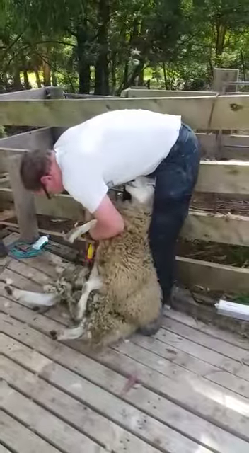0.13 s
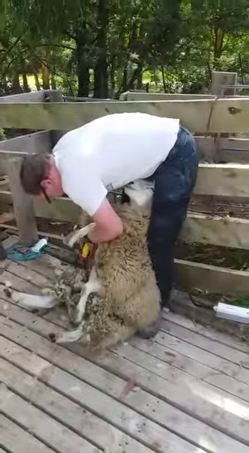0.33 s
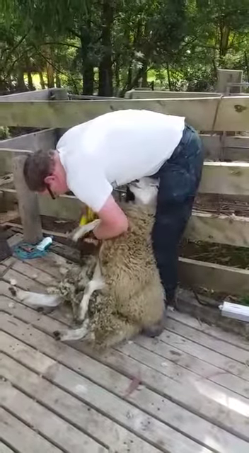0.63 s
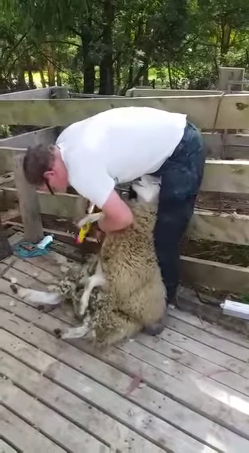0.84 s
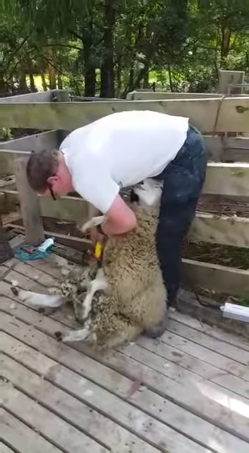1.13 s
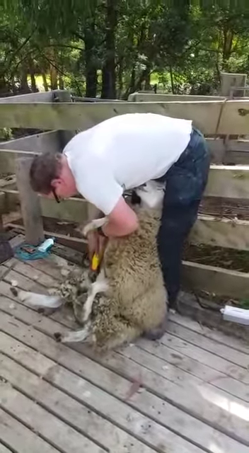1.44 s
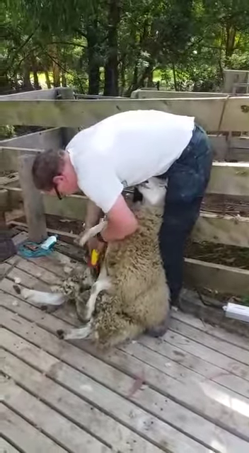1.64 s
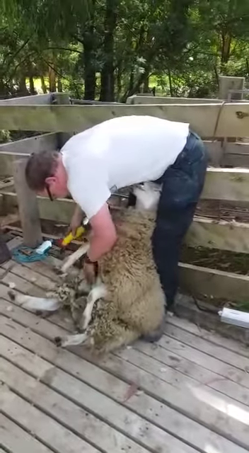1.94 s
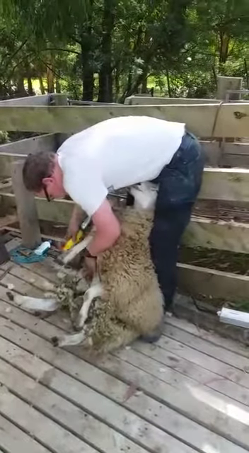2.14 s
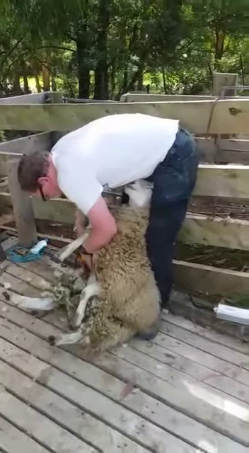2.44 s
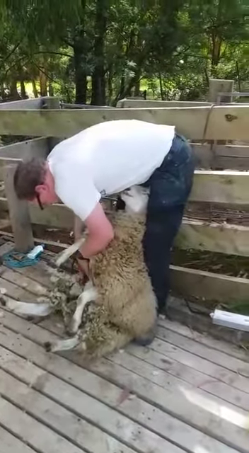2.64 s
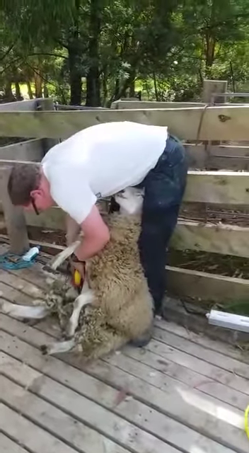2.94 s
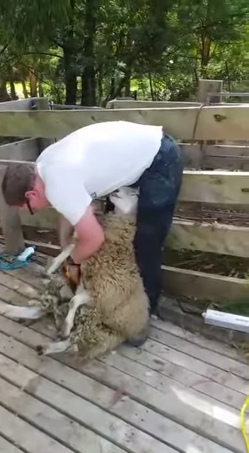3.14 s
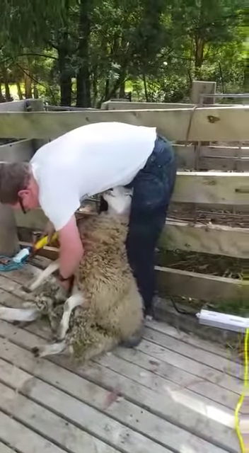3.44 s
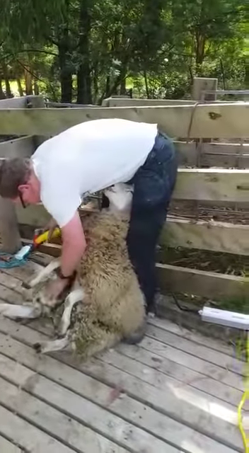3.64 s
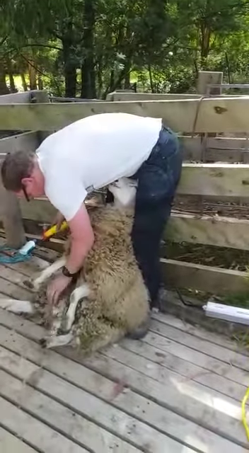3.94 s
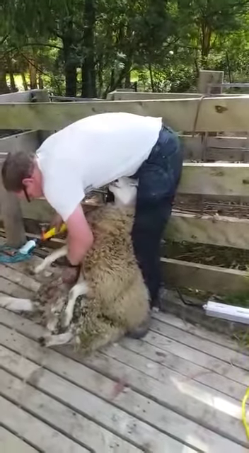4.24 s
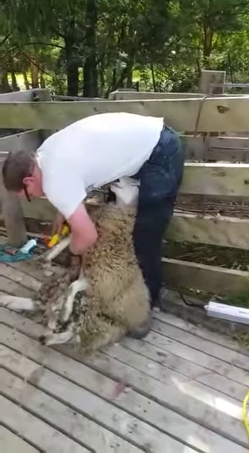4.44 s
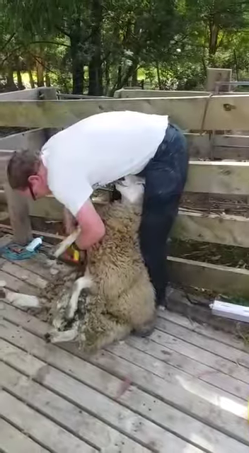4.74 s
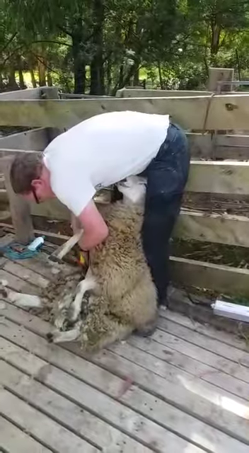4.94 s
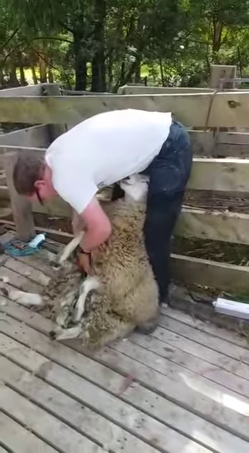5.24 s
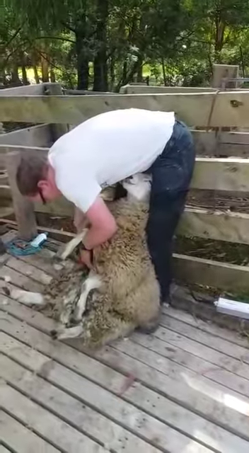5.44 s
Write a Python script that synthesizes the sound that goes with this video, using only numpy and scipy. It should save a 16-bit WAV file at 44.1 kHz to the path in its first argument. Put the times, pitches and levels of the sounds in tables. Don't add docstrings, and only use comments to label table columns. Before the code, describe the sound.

Continuous raspy buzz of electric sheep clippers, hissing and chattering, shifting slightly in tone as the hand turns, with soft low wind thumps.

```python
import sys
import numpy as np
from scipy import signal
from scipy.fft import irfft
from scipy.io import wavfile
from scipy.ndimage import uniform_filter1d

SR = 44100
rng = np.random.default_rng(int(sys.argv[2]) if len(sys.argv) > 2 else 0)


def to_wav(s):
    ch = np.atleast_2d(s).T
    pcm = np.round(np.clip(ch, -1, 1) * 32767)
    wavfile.write(sys.argv[1], SR, pcm.astype(np.int16))


def voltage_ratio(decibels):
    exponent = np.asarray(decibels, float) / 20
    return 10 ** exponent


N = 246078
TIME = np.arange(N) / SR

# (time [s], speed [turns/min])
CRANK = [
    (0.0, 2899.5),
    (0.7, 2898.2),
    (1.05, 2891.8),
    (1.55, 2903.6),
    (2.5, 2901.5),
    (3.2, 2906.0),
    (3.4, 2901.8),
    (5.0, 2902.4),
    (5.58, 2905.2),
]
# (time [s], nearness [dB], turn of the comb toward us [dB],
# roll of the fork toward us [dB], tilt of the blade edge toward us [dB])
HAND = [(0, -32.5, 2, -8, -1), (.2, -30, -3, -11, -4.5), (.72, -30.5, 3.5, -5.5, 0),
        (1.06, -31.5, 4.5, -6.5, -2), (1.2, -30.5, -1.5, -10, -4), (1.55, -31, 1.5, -6, -3),
        (2.1, -30.5, 1.5, -5.5, -3), (2.36, -32, 4.5, -4, -1.5), (2.55, -33, 1, -5.5, 0),
        (2.88, -31.5, 1, -10, -1), (3.1, -32.5, 0, -6, -1), (3.42, -31.5, 2, -9, -1.5),
        (3.65, -29.5, -4, -6.5, -4), (4.2, -32, -0.5, -4.5, 0), (4.42, -30.5, 1, -9.5, -0.5),
        (4.68, -31, 2, -5, 0), (5.1, -32.5, 1, -8, 0.5), (5.58, -32.5, 1, -7.5, -.5)]


def evened(x):
    return x / np.sqrt(np.mean(x ** 2) + 1e-20)


def curve(rows, t):
    s, *columns = np.transpose(rows)
    return [np.interp(t, s, c) for c in columns]


def read(points, hz):
    f, value = np.transpose(points)
    return np.interp(np.log(hz + 1), np.log(f + 1), value)


def drift(t, top_hz, count):
    f = np.geomspace(.1, top_hz, 16)
    phase = 2 * np.pi * (f * t[:, None, None] + rng.random((count, 16)))
    return evened((np.sin(phase) / np.sqrt(f)).sum(-1))


def colour(x, field_db, size=1024):
    hop_overlap = size * 3 // 4
    hz, t, z = signal.stft(x, SR, nperseg=size, noverlap=hop_overlap)
    shaped = z * voltage_ratio(field_db(hz[:, None], t))
    return signal.istft(shaped, SR, nperseg=size, noverlap=hop_overlap)[1][:N]


def resonate(x, hz, width):
    turn = np.exp(2j * np.pi * np.cumsum(hz) / SR)
    r = np.exp(-np.pi * width / SR)
    return 2 * (turn * signal.lfilter([1 - r], [1, -r], x / turn)).real


def contacts(turns, wander_db, scatter_db):
    # (place in the turn [0-1], knock [dB], bright tick [dB])
    tooth_rows = [
        (.01, -4, -17),
        (0.112, 2, -6.5),
        (0.208, 0, -0.5),
        (0.332, -7, -22),
        (0.439, 0, -6),
        (.55, -8.5, -3),
        (0.619, 1, -3),
        (0.681, -7, -2),
        (.81, -5, -8),
        (0.909, 8.5, -25),
    ]
    place, knock_db, tick_db = np.transpose(tooth_rows)
    whole = np.arange(int(turns[-1]) + 1)
    start = np.interp(whole, turns, TIME)
    index = (np.interp(whole[:, None] + place, turns, TIME) * SR).astype(int)
    luck = rng.standard_normal((len(whole), len(place), 2))
    trains = np.zeros((2, N))
    for k, db in enumerate((knock_db, tick_db)):
        wander = drift(start, 3.0, count=len(place))
        trains[k, index] = voltage_ratio(db + wander_db * wander + scatter_db * luck[..., k])
    return signal.oaconvolve(trains, signal.windows.hann(61)[None], "same", axes=1)


def wear(turns, back_stroke, count=6, size=8192, order=340):
    parts = rng.standard_normal((count, order, 2))
    odd = 1 - back_stroke * (-1.) ** np.arange(order)
    shapes = irfft((parts[..., 0] + 1j * parts[..., 1]) * odd, size)
    coarse = TIME[::512]
    blend = .35 + drift(coarse, 2.5, count=count).T
    place = np.arange(size) / size
    return evened(sum(np.interp(TIME, coarse, b) * np.interp(turns, place, s, period=1)
                      for s, b in zip(shapes, blend)))


def facing(t):
    near_db, turn_db, roll_db, tilt_db = (c - c.mean() for c in curve(HAND, t))
    wander = drift(t, 1.5, count=2).T
    casing_hz = 2200 - 14 * turn_db + 22 * tilt_db + 40 * wander[0]
    comb_hz = 3380 + 22 * turn_db + 45 * wander[1]
    return near_db, turn_db, roll_db, tilt_db, casing_hz, comb_hz


def head(hz, t):
    # (frequency [Hz], level [dB per Hz])
    steel = [(190, -65), (315, -31), (634, -27.5), (1090, -28), (1240, -12.5), (2150, 1), (2880, -3.5),
             (3230, -0.5), (4260, -8.5), (5010, -7), (6090, -11), (7900, -5), (10400, -25), (12700, -15),
             (15400, -20)]
    # (frequency [Hz], width [Hz], level [dB])
    modes = [(2550, 120, -1.5), (4160, 1100, 2), (5150, 230, 2.5), (6670, 500, 4.5), (7260, 79, 1),
             (7720, 370, 2.5), (7870, 51, -12), (8140, 170, 4), (8560, 650, 2), (10300, 360, -2)]
    level_db, comb_db, fork_db, sizzle_db, casing_hz, comb_hz = facing(t)

    def share(edge_hz, width):
        return 1 / (1 + np.exp((edge_hz - hz) / width))

    def ring(centre_hz, width):
        return 1 / (1 + (2 * (hz - centre_hz) / width) ** 2)

    bands = ((comb_db, share(2740, 80) - share(4470, 130)),
             (fork_db, share(4530, 100) - share(5200, 100)),
             (sizzle_db, share(5360, 100) - share(9300, 300)),
             (0.46 * fork_db, share(10300, 300)))
    turning = sum((db - db.mean()) * part for db, part in bands)
    swing = drift(t, 2.84, count=len(modes)).T
    rings = sum((db + s * f / 5000) * ring(f, w) for (f, w, db), s in zip(modes, swing))
    rings = rings + 4.47 * ring(casing_hz, 650) + 1.75 * ring(comb_hz, 440)
    chatter = rng.standard_normal((len(hz), len(t)))
    chatter = uniform_filter1d(chatter, size=14, axis=0)
    chatter = evened(uniform_filter1d(chatter, size=6, axis=1))
    loose = 1.03 + 0.16 * ring(casing_hz, 740)
    return read(steel, hz) + level_db - level_db.mean() + turning + rings + loose * chatter


def blades(turns):
    # (frequency [Hz], ratio [dB])
    repeat_rows = [(900, -14), (1200, -6), (1700, -6), (2200, -6), (2700, -4), (3250, -5), (3650, -3),
                   (4100, -5), (4750, -5), (5300, -4), (7500, -2), (9000, -3), (12000, -7)]
    knocks, ticks = contacts(turns, wander_db=0.5, scatter_db=-2.5)
    rubbing = np.array([wear(turns, back_stroke=.35), rng.standard_normal(N)])
    drive = 0
    for press, kind, gate in ((knocks, "low", .19), (ticks, "high", .27)):
        scrape = rubbing * (1 + gate * evened(press))
        split = signal.butter(3, 4300, kind, fs=SR, output="sos")
        drive = drive + signal.sosfilt(split, scrape / scrape.std())

    def repeat(hz):
        return voltage_ratio(2 * read(repeat_rows, hz))

    periodic = colour(drive[0], lambda hz, t: -10 * np.log10(1 + 1 / repeat(hz)))
    chance = colour(drive[1], lambda hz, t: -10 * np.log10(1 + repeat(hz)))
    small = signal.butter(3, 560, "high", fs=SR, output="sos")
    return voltage_ratio(-27.0) * evened(signal.sosfilt(small, colour(periodic + chance, head)))


def fork(turns, hz=4930, t60=.012, ping_db=-44.5):
    level_db, _, fork_db = curve(HAND, TIME)[:3]
    facing_db = level_db + fork_db
    back = (np.ceil(turns) - turns) / np.gradient(turns)
    strikes = np.diff(np.floor(turns), append=0) > 0
    train = strikes * (1 - back) + np.roll(strikes * back, 1)
    t = np.arange(700) / SR
    ping = voltage_ratio(-60 * t / t60) * np.sin(2 * np.pi * hz * t) * (1 - np.exp(-t / .0006))
    pings = evened(signal.oaconvolve(train, ping)[:N])
    return voltage_ratio(ping_db + 1.6 * (facing_db - facing_db.mean())) * pings


def tones(turns, rows, spread):
    coarse = TIME[::512]
    start = spread * rng.standard_normal(len(rows))
    waver = drift(coarse, 8.0, count=len(rows)).T
    slip = drift(coarse, 12.0, count=len(rows)).T
    total = 0
    for (k, db, swing_db), w, s, p in zip(rows, waver, slip, start):
        level = np.sqrt(2) * voltage_ratio(db + swing_db * np.interp(TIME, coarse, w))
        phase = 2 * np.pi * k * turns + p + .025 * k * np.interp(TIME, coarse, s)
        total = total + level * np.sin(phase)
    return total


def motor(turns):
    # (multiple of the motor speed, level [dB rms], waver [dB])
    whine_rows = [(1, -68.5, 2), (4, -70, 3), (5, -53, 1.5), (15, -47, 2.5), (24, -61, 3), (30, -46, 2.5),
                  (32, -55, 3)]
    # (multiple of the crank speed, level [dB rms], waver [dB])
    hum_rows = [(9, -73, 3), (11, -75, 3), (12, -72, 3), (15, -66, 2.5), (16, -71, 3), (17, -68, 3.5),
                (18, -67, 3.5), (19, -67, 3.5)]
    # (multiple of the crank speed, level [dB rms], waver [dB])
    comb_rows = [(45, -46, 3.5), (57, -48, 3), (58, -48, 3), (63, -48, 3), (65, -45, 3), (66, -47, 3),
                 (67, -43, 2), (69, -43.5, 2.5), (71, -48, 3.5), (72, -48, 3), (73, -45, 2.5),
                 (74, -45, 2.5)]
    # (multiple of the crank speed, level [dB rms], waver [dB])
    groan_rows = [(13, -68, 2), (69, -48, 1.5)]
    gear, free_rpm, labour_rpm, labour_db = 21 / 4, 2902, 3.5, 7
    level_db, comb_db = curve(HAND, TIME)[:2]
    facing_db = level_db + comb_db
    comb = voltage_ratio(1.3 * (facing_db - facing_db.mean())) * tones(turns, comb_rows, spread=0)
    labour = np.clip((free_rpm - curve(CRANK, TIME)[0]) / labour_rpm, 0, 1)
    groan = voltage_ratio(labour_db * labour) * tones(turns, groan_rows, spread=3)
    whine = tones(gear * turns, whine_rows, spread=3)
    return whine + tones(turns, hum_rows, spread=3) + groan + comb


def murmur():
    # (frequency [Hz], level [dB per Hz])
    yard_rows = [(18, -50), (30, 24), (197, -14.5), (249, -3.5), (433, -8.5), (721, -2.5), (1090, -5),
                 (1200, -18), (1560, -27), (2640, -120)]
    noise = rng.standard_normal(N)
    air = colour(noise, lambda hz, t: read(yard_rows, hz) - 22 * (hz < 100) + 0 * t, size=2048)
    air = voltage_ratio(-55 - 3.0) * evened(air)
    return signal.sosfilt(signal.butter(4, 52, "high", fs=SR, output="sos"), air)


def wind():
    # (time [s], strength [dB], hold [s])
    gust_rows = [(0.033, -46.5, .06), (.33, -65, .03), (.44, -44, 0.058), (0.535, -51.5, 0.096),
                 (0.668, -54.5, 0.13), (0.867, -52, .012), (1.415, -59, .02), (1.523, -61, .012),
                 (1.617, -60, .012), (1.977, -46.5, 0.026), (.93, -69, .42), (2.25, -61, .03),
                 (2.377, -58, 0.018), (3.154, -59, 0.066), (3.245, -51.5, .02), (3.396, -51, .04),
                 (3.463, -34, 0.011), (3.536, -46.5, 0.0052), (3.616, -33.5, 0.027), (3.71, -37, .012),
                 (3.768, -48, .055), (3.885, -45.5, .02), (4.314, -56.5, .02), (4.454, -57, .08),
                 (4.763, -49.5, .03), (4.88, -49, 0.015), (5.09, -62, .1), (5.256, -46, .012),
                 (5.35, -58, .07), (5.484, -42, 0.028)]
    rise, fall = 700, 480
    coarse = TIME[::64]
    start, db, hold = np.transpose(gust_rows)[..., None]
    gusts_db = db - rise * np.maximum(start - coarse, 0) - fall * np.maximum(coarse - start - hold, 0)
    breeze_db = -76 + 4 * drift(coarse, 12.0, count=1)[:, 0]
    push = voltage_ratio(gusts_db).sum(0) + voltage_ratio(breeze_db)
    hump, hz = rng.standard_normal(N), np.full(N, 80)
    for width in (68, 110, 110):
        hump = resonate(hump, hz, width)
    hump = signal.sosfilt(signal.butter(5, 45, "high", fs=SR, output="sos"), hump)
    steady = hump / np.sqrt(uniform_filter1d(hump ** 2, 1800) + 1e-12)
    lumps = voltage_ratio(1.5 * drift(coarse, 25.0, count=1)[:, 0])
    gusting = uniform_filter1d(np.interp(TIME, coarse, push * lumps), 500) * steady
    return signal.sosfilt(signal.butter(3, 48, "high", fs=SR, output="sos"), gusting)


def wind_filter(x):
    # (start [s], end [s], depth [dB])
    spans = [
        (.16, .46, -2),
        (3.48, 3.66, -6),
        (3.93, 4.406, -6),
        (4.6, 5.12, -2.5),
    ]
    cut_db = sum(db * ((TIME > start) & (TIME < end)) for start, end, db in spans)
    low = signal.sosfiltfilt(signal.butter(3, 560, fs=SR, output="sos"), x)
    return x - (1 - voltage_ratio(uniform_filter1d(cut_db * 1., size=900))) * low


def far_call():
    # (time [s], pitch [Hz], level [dB])
    call_rows = [
        (3.74, 700, -88),
        (3.8, 678, -62),
        (3.88, 652, -60),
        (3.95, 635, -67),
        (4.06, 640, -63),
        (4.15, 665, -58),
        (4.21, 682, -61),
        (4.27, 700, -88),
    ]
    hz, call_db = curve(call_rows, TIME)
    return voltage_ratio(call_db) * np.sqrt(2) * np.sin(2 * np.pi * np.cumsum(hz) / SR)


def scene():
    turns = np.cumsum(curve(CRANK, TIME)[0] / 60) / SR
    sources = blades(turns) + fork(turns) + motor(turns) + murmur() + far_call()
    return np.tile(wind_filter(sources) + wind(), (2, 1))


def band_limit(x):
    return signal.sosfilt(signal.butter(12, 16890, fs=SR, output="sos"), x)


def record(dry):
    steep = signal.firwin(1023, 15760, window=("kaiser", 9), fs=SR)
    limited = signal.oaconvolve(dry, steep[None], "same", axes=1)
    return band_limit(limited)


dry = scene()
out = record(dry)
to_wav(out)
```